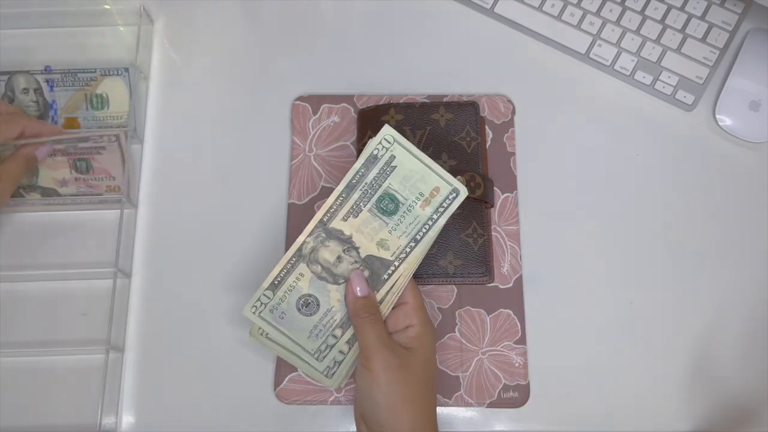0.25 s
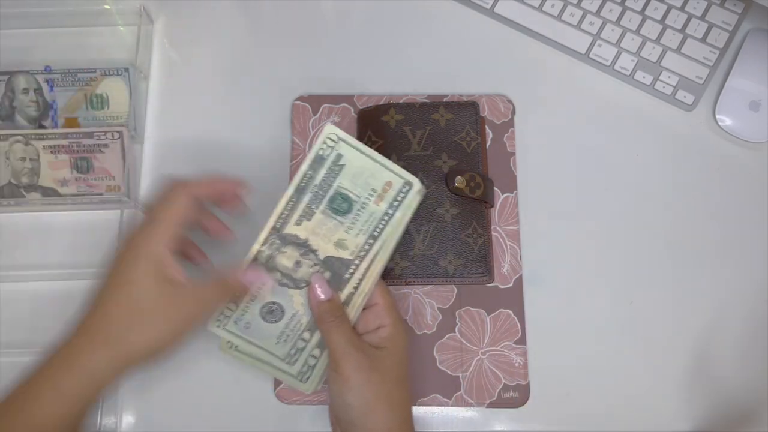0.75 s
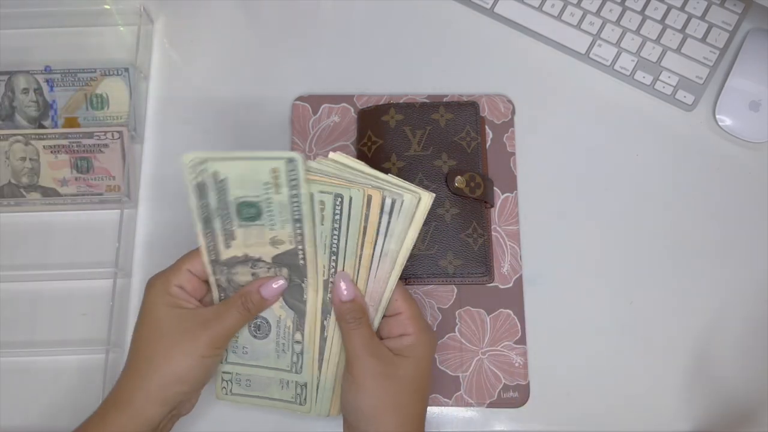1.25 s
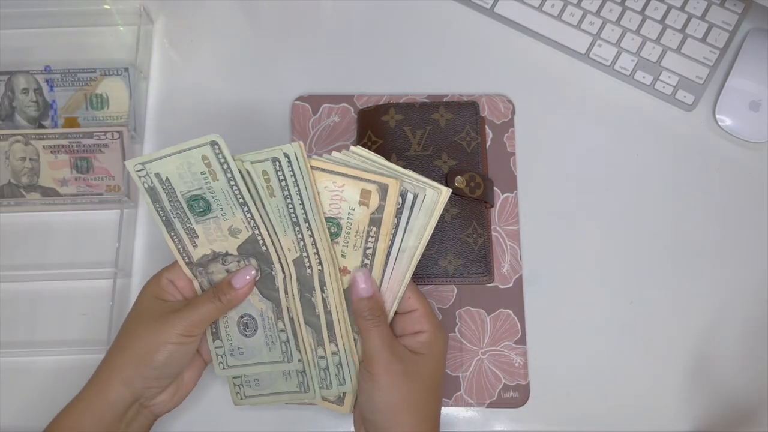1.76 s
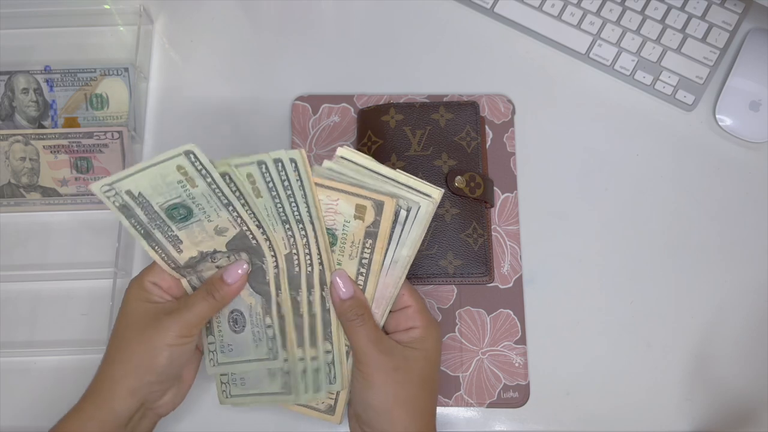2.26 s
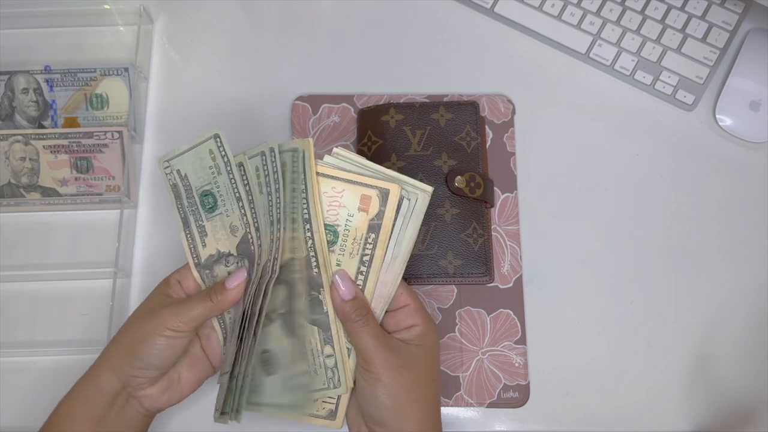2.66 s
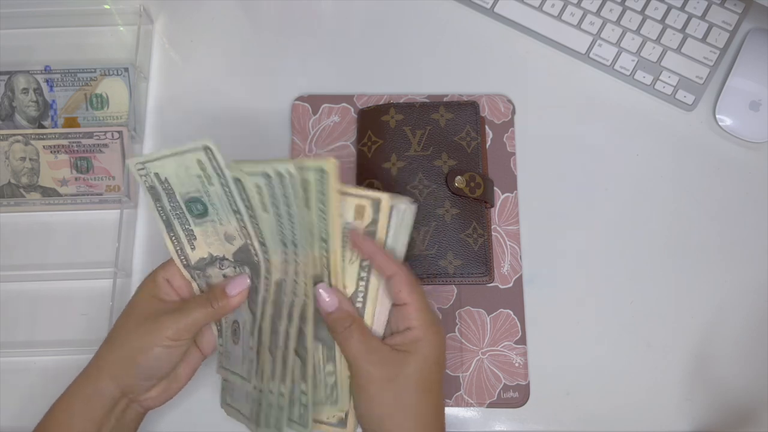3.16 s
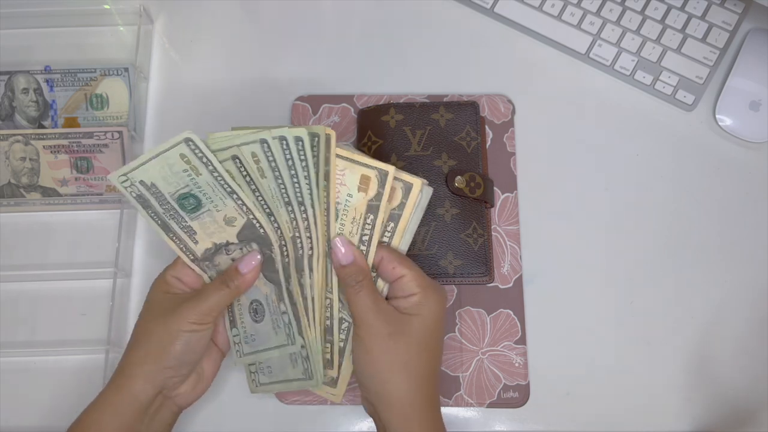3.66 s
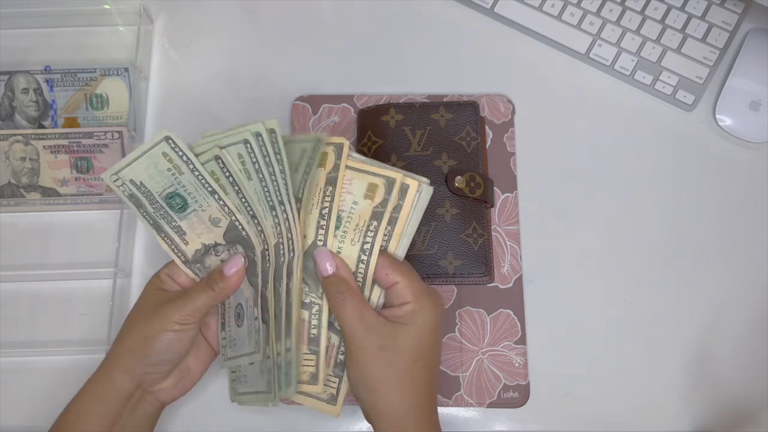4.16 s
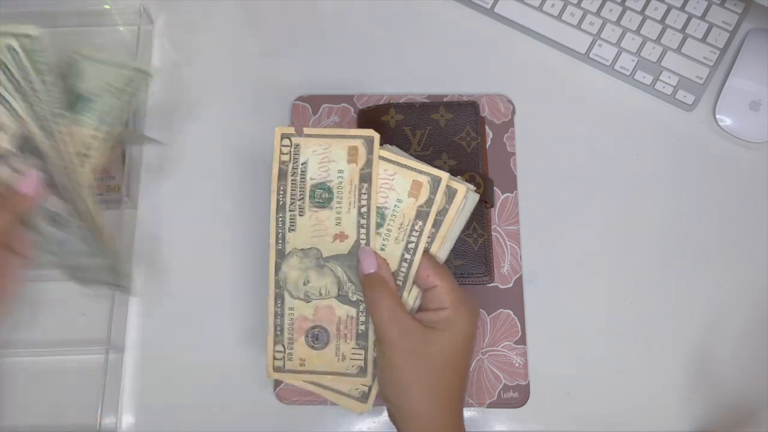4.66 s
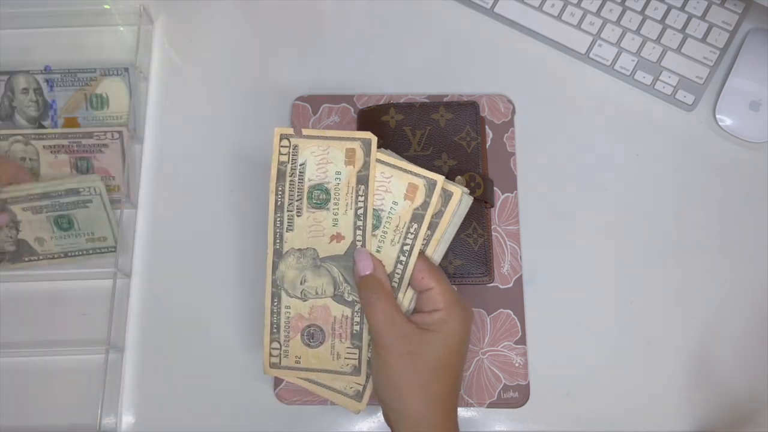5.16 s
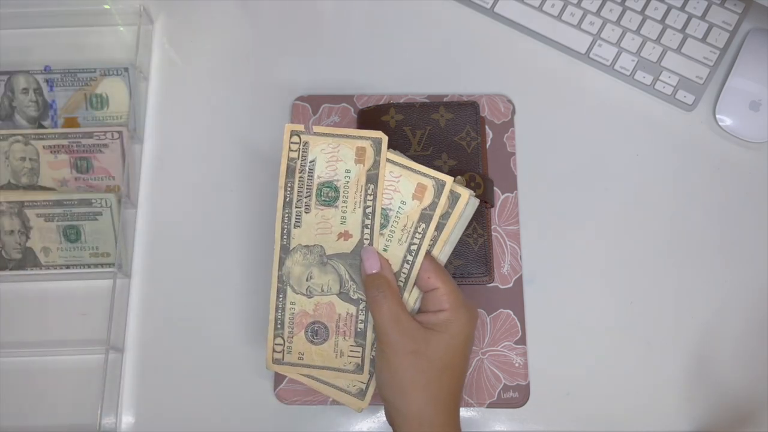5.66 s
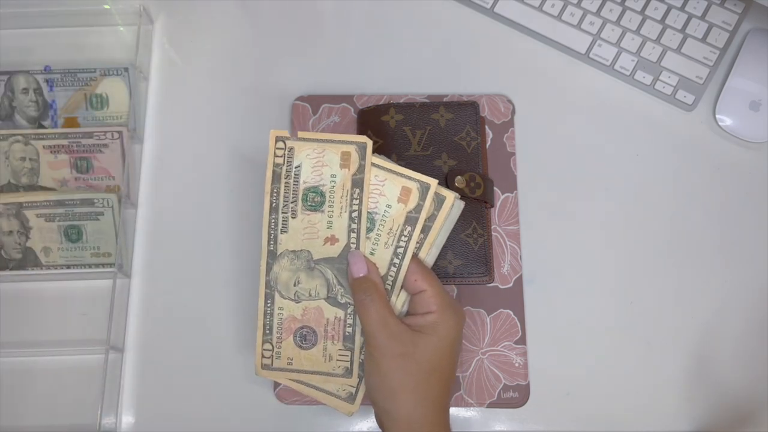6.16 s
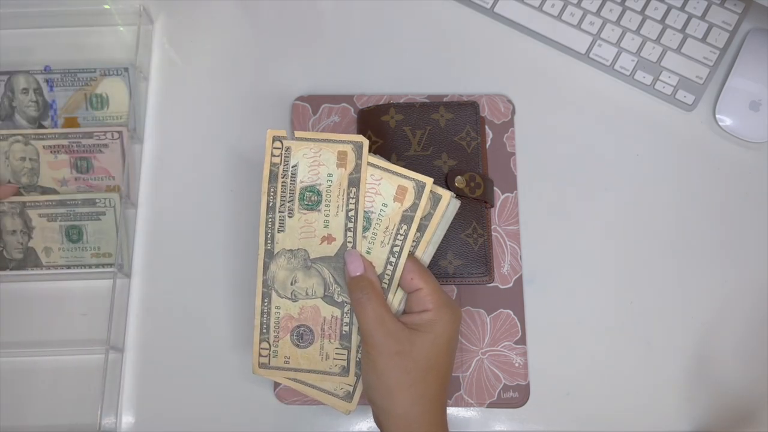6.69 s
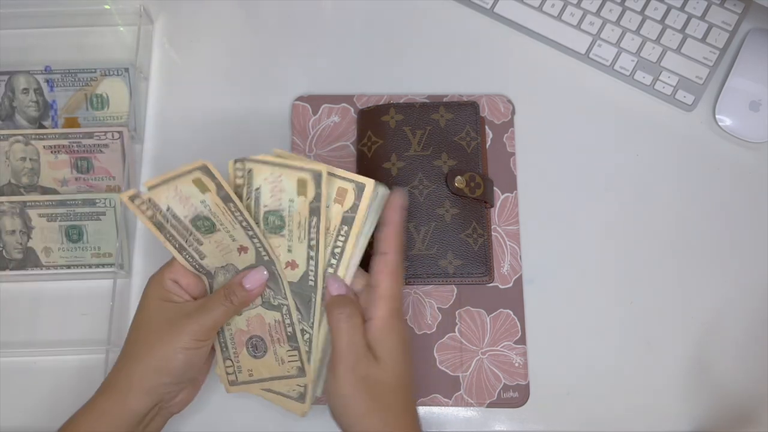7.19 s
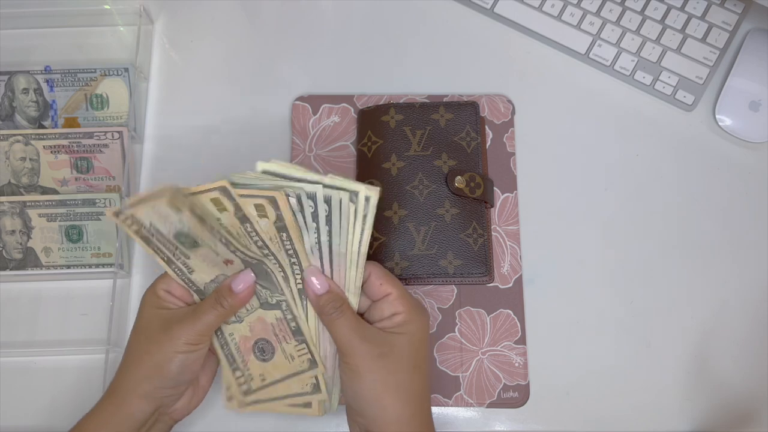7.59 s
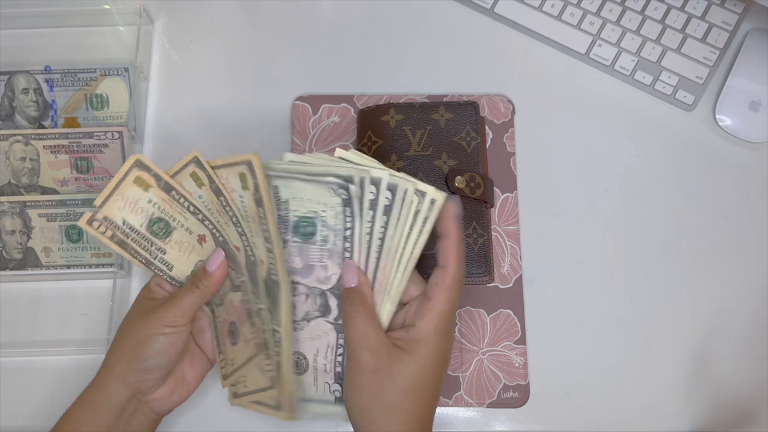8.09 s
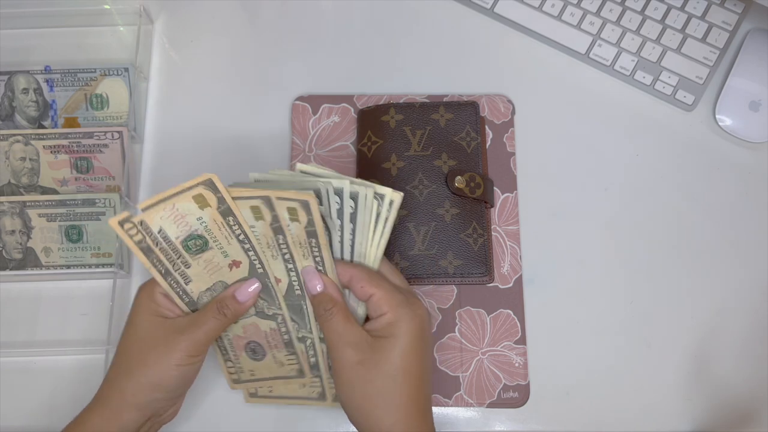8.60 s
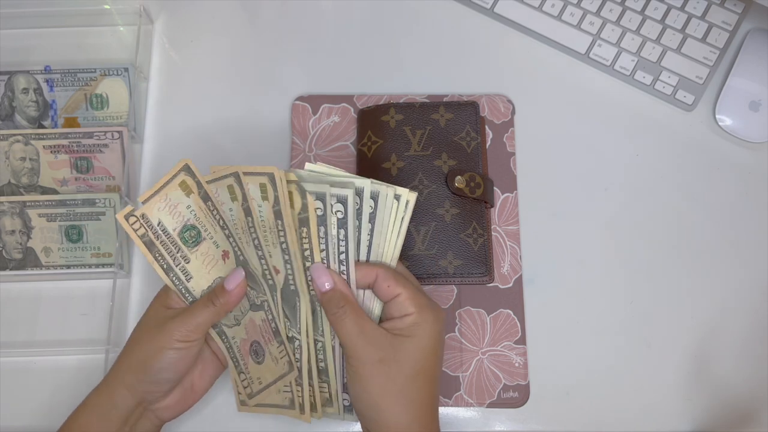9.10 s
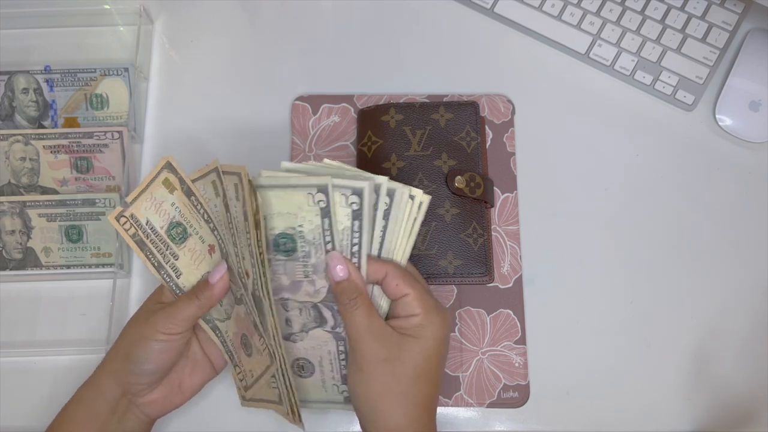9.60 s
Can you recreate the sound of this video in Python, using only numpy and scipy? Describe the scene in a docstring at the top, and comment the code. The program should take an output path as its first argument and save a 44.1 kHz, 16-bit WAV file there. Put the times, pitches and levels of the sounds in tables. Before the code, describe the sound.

Paper banknotes rustle, slide and snap between two hands, with sharp little clicks as they are tapped into a plastic tray on a desk.

```python
"""Paper banknotes are fanned, slid over each other and pressed into a plastic tray, under a phone above a desk.
Sliding sheets hiss as noise in fine, uneven grains; the stack flaps below. Creases and flicks are sprays of clicks.
Scraped edges sing as noise in narrow bands. Touches ring a few tray tones; the desk thuds dully.
Fading noise makes the echoes of desk and walls, over filtered noise for room air and a low rumble.
Two microphone ports hear it all out of step."""
import sys
import numpy as np
from scipy import signal
from scipy.fft import rfft, irfft, next_fast_len
from scipy.io import wavfile
from scipy.ndimage import uniform_filter1d

SR = 44100
rng = np.random.default_rng(int(sys.argv[2]) if len(sys.argv) > 2 else 0)


def generate_wav(sig):
    """Save sig (samples, or channels by samples) to the path in sys.argv[1] as 16-bit PCM at SR."""
    pcm = np.round(np.clip(np.atleast_2d(sig).T, -1, 1) * 32767).astype(np.int16)
    wavfile.write(sys.argv[1], SR, pcm)


N = 433944  # length in samples


def undb(db):
    """Turn decibels into an amplitude factor."""
    return 10 ** (np.asarray(db) / 20)


def unit(x):
    """Scale to rms 1."""
    return x / np.sqrt(np.mean(x ** 2, axis=-1, keepdims=True))


def curve(table, column):
    """One column of a time table at every sample."""
    return np.interp(np.arange(N) / SR, [row[0] for row in table], [row[column] for row in table])


def across(table, column, size):
    """One column of a frequency table at every bin of a transform."""
    hz = np.arange(1, size // 2 + 2) * SR / size
    return np.interp(np.log(hz), np.log([row[0] for row in table]), [row[column] for row in table])


def colour(x, table, size=4096):
    """Causal filter with the shape of the given spectrum that keeps the power of white noise."""
    # folding the cepstrum makes the filter respond as early as possible
    cepstrum = irfft(np.log(undb(across(table, column=1, size=size))))
    cepstrum[1:size // 2] *= 2
    cepstrum[size // 2 + 1:] = 0
    response = irfft(np.exp(rfft(cepstrum)))
    return signal.fftconvolve(x, response / np.sqrt(np.sum(response ** 2)))[:N]


def band(x, lo_hz, hi_hz):
    """Band-pass that keeps the power of white noise."""
    sos = signal.butter(2, [lo_hz, hi_hz], "bandpass", fs=SR, output="sos")
    return signal.sosfilt(sos, x) * np.sqrt(SR / 2 / (hi_hz - lo_hz))


def walk(rate):
    """Random levels held 1 / rate s, smoothed twice and scaled to rms 1."""
    k = int(SR / rate)
    steps = np.repeat(rng.standard_normal(N // k + 1), k)
    return unit(uniform_filter1d(uniform_filter1d(steps, k), k)[:N])


def slips(spread_db, grain_ms):
    """Noise in short grains of uneven size: fibres that catch and let go."""
    k = max(int(grain_ms * SR / 1000), 1)
    grain_db = spread_db * np.minimum(rng.exponential(size=N // k + 1), 3)
    size = np.repeat(undb(grain_db), k)[:N]
    return unit(size * rng.standard_normal(N))


def crackle(rate, spread_db, fall_ms):
    """Envelope of lone ticks of uneven size, on average rate per second, each dying away."""
    size = undb(spread_db * np.minimum(rng.exponential(size=N), 3))
    ticks = (rng.random(N) < rate / SR) * size
    return signal.lfilter([1], [1, -np.exp(-1000 / (fall_ms * SR))], ticks)


def bursts(table, column, fall_ms):
    """Envelope that rises within 2.2 ms at each event and dies away exponentially."""
    kicks = np.zeros(N)
    for row in table:
        kicks[int(row[0] * SR)] = undb(row[column])
    t = np.arange(SR // 8) / SR
    shape = np.exp(-t * 1000 / fall_ms) * np.minimum(t / 0.0022, 1)
    return signal.oaconvolve(kicks, shape)[:N]


def blows(table, fall_ms, thump_ms, thump_db, crack_db, sizzle_db):
    """A spray of clicks at each event: soft low push, crack and bright sizzle."""
    thump = band(slips(0.76, 0.47) * bursts(table, column=2, fall_ms=thump_ms), 250, 844)
    crack = band(slips(2.4, 0.46) * bursts(table, column=1, fall_ms=fall_ms), 910, 4110)
    sizzle = band(slips(3.5, 0.4) * bursts(table, column=3, fall_ms=1.18 * fall_ms), 4900, 14000)
    return undb(thump_db) * thump + undb(crack_db) * crack + undb(sizzle_db) * sizzle


def strokes():
    """Level in dB and brightness of all sliding: each stroke swells and fades over the rustle of the grip."""
    # one sheet pulled over the next: full_speed_s, level_db, length_s, brightness [dB per octave]
    pulls = [(0.256, -44.5, 0.085, 1), (0.373, -46.5, 0.18, -0.9), (0.509, -44, 0.086, 0.2),
             (0.825, -51.5, 0.15, 0.3), (1.066, -59, 0.82, -2), (1.481, -59, 0.23, 0.5),
             (1.915, -54.5, 0.42, -0.5), (2.606, -61, 0.13, 0.7), (2.857, -55.5, 0.24, 1.5),
             (3.16, -52, 0.51, 0.1), (3.42, -53.5, 0.41, 0.9), (3.577, -53.5, 0.49, -0.5),
             (3.903, -59.5, 0.16, -0.3), (4.143, -56, 0.47, -1.5), (4.474, -51.5, 0.41, 1.1),
             (4.674, -50, 0.25, 1.1), (4.994, -43.5, 0.23, -1), (5.157, -56, 0.68, -1),
             (5.453, -50, 0.19, -0.5), (6.119, -51.5, 0.15, -1), (6.708, -59, 0.14, -0.5),
             (7.103, -53.5, 0.39, 0), (7.365, -50.5, 0.38, 1.16), (7.493, -46.5, 0.052, 0.5),
             (7.636, -54.5, 0.33, -0.5), (8.033, -46.5, 0.42, 1), (8.203, -44.5, 0.1, 1),
             (8.846, -57.5, 0.26, 1), (8.975, -55.5, 0.18, 1.5), (9.49, -55.5, 0.2, 0)]
    # rustle of the notes held in the hands, which swells and nearly dies away: time_s, level_db
    grip = [(0, -59), (.55, -79), (.7, -93), (.95, -66.5), (1.7, -79.5), (2.33, -68), (2.52, -84.5),
            (4.3, -79), (4.85, -97), (5.4, -60.5), (5.68, -91), (6.95, -88.5), (7.85, -73.5), (8.46, -57),
            (8.7, -66), (9.18, -64.5), (9.3, -64), (9.84, -64)]
    range_db, rise = 26.5, 0.4  # swell over the length; share of it spent rising
    t = np.arange(N) / SR
    power = undb(2 * curve(grip, column=1))  # twice the dB turns amplitude into power
    bright = np.zeros(N)
    for at, db, length, tilt in pulls:
        near = slice(max(int((at - 2 * length) * SR), 0), int((at + 2 * length) * SR))
        away = np.maximum((at - t[near]) / rise, (t[near] - at) / (1 - rise)) / length
        swell = undb(2 * (db - range_db * away))
        power[near] += swell
        bright[near] += tilt * swell
    return 10 * np.log10(power), bright / power


def at_tray():
    """1 while the hand works in the tray, where the notes flap a little more softly; 0 elsewhere."""
    # times in the tray: start_s, end_s
    visits = [(0, 0.9), (4.849, 6.85)]
    t = np.arange(N) / SR
    return sum((t > start) & (t < end) for start, end in visits)


def sliding():
    """Sheets hiss past each other in uneven slips and crackle; the stack flaps softly below."""
    # loudness of the hiss from low to high: pitch_hz, level_db
    sheet = [(1000, -18.5), (2500, -11), (5500, -11), (11500, -4)]
    stroke_db, bright = strokes()
    drag_db = stroke_db + 1.59 * walk(35)
    # a fast stroke is a smooth swish; ticks stand out most in slow handling
    loose = undb(np.minimum(-0.35 * (drag_db + 60.5), 5))
    wide = loose * crackle(30, 3, 1.2)
    hiss = 0
    for hz in 1000 * 2 ** np.arange(0, 3.6, 0.4):
        sheet_db = np.interp(np.log(hz), np.log([row[0] for row in sheet]), [row[1] for row in sheet])
        # some ticks span the whole sheet, others only one size of fold
        grain = 0.74 + 0.68 * wide + 1.0 * loose * crackle(17, 3.26, 4.16)
        fibres = band(grain * slips(0.65, 0.91), 0.876 * hz, 1.303 * hz)
        hiss = hiss + fibres * undb(sheet_db + bright * np.log2(hz / 3400) + 1.8 * walk(18))
    grain = 0.68 + 0.5 * wide + 1.19 * loose * crackle(55, 1.5, 4.5)
    # 7 dB softer than the slide, 3 dB softer in the tray; placed 3 octaves below the middle of the hiss
    flap_db = -7 - 3 * at_tray() - 3 * bright + 0.37 * walk(8.9)
    flap = band(grain * slips(2.8, 3.3), 88, 830) * undb(flap_db)
    return (hiss + flap) * undb(drag_db)


def scraping():
    """A note edge scrapes and sings: uneven slips ring a few narrow resonances of the bent note."""
    # scrapes: middle_s, length_s, lowest_hz, level_db
    scrapes = [(3.552, 0.048, 1725, -59.5), (8.338, 0.061, 800, -67.5)]
    # pitches of the resonances as multiples of the lowest
    ratios = (1, 1.4, 1.85, 2.2)
    t, out = np.arange(N) / SR, np.zeros(N)
    for at, length, hz, db in scrapes:
        near = np.abs(t - at) < length
        swell = np.clip(3 * (1 - 2 * np.abs(t[near] - at) / length), 0, 1)
        rub = slips(3.4, 2.5)[near] * undb(db) * swell
        out[near] = sum(band(rub, 0.946 * hz * r, 1.06 * hz * r) for r in ratios)
    return out


def snapping():
    """A crease gives way in a short spray of clicks."""
    # creases snapping in the hands, levels before the trims below: start_s, crack_db, thump_db, sizzle_db
    snaps = [(1.0945, -38.5, -41, -40), (2.226, -43, -54.5, -48.5), (2.394, -43, -40, -51.5),
             (2.4201, -37.5, -44, -48), (2.6917, -46, -57.5, -73), (2.9456, -36, -59, -55),
             (2.9973, -32, -45.5, -50.5), (3.0275, -39.5, -73, -55), (3.2824, -48.5, -51, -60),
             (4.1002, -31.5, -44, -39), (7.0239, -44, -48, -50), (7.0662, -40.5, -45.5, -49),
             (7.6914, -39.5, -49.5, -52.5), (8.0598, -33.5, -47, -43), (8.0822, -31.5, -52, -46),
             (8.3819, -19.5, -48.5, -24.5), (9.191, -33, -53.5, -62), (9.632, -39, -46.5, -51)]
    return blows(snaps, fall_ms=4.1, thump_ms=10.2, thump_db=3.0, crack_db=-5.5, sizzle_db=3.1)


def flicking():
    """Each flick is a short spray of clicks around the pitch of the bent edge."""
    # a nail flicks the edge of a note: start_s, level_db, pitch_hz
    flicks = [(.044, -40, 2880), (.551, -44.5, 990), (.835, -46.5, 818), (.965, -55.5, 2500),
              (1.148, -46, 990), (3.876, -57.5, 700), (6.071, -59.5, 1800), (6.213, -48.5, 1300),
              (6.749, -50.5, 1040), (8.12, -49, 1490), (8.164, -47, 4000), (8.205, -42, 3800),
              (8.364, -47, 1200), (8.446, -59, 2940), (8.512, -51, 2370), (8.537, -50.5, 904),
              (8.618, -54, 830), (8.909, -46.5, 1750), (9.398, -50, 2030)]
    out, t = np.zeros(N + SR), np.arange(SR // 20) / SR
    shape = np.exp(-t / 0.0047) * np.minimum(t / 0.0011, 1)
    spray = rng.standard_normal((len(flicks), len(t))) * shape
    for (at, db, hz), clicks in zip(flicks, spray):
        start = int(at * SR)
        out[start:start + len(t)] += undb(db) * band(clicks, 0.76 * hz, 1.27 * hz)
    return out[:N]


def tray():
    """A spray of clicks at each touch; the push of the hand sets the plastic box ringing."""
    # notes and nails striking the tray, levels before the trims below: start_s, crack_db, push_db, sizzle_db
    taps = [(0.023, -26.5, -46, -47), (0.063, -19.5, -39.5, -39), (0.0824, -29, -46, -39),
            (0.1249, -27, -37.5, -33.5), (0.1419, -26.5, -49.5, -61), (.272, -35, -43, -60),
            (0.386, -38, -42, -65), (0.401, -32.5, -42.5, -38), (0.4281, -35, -44.5, -51),
            (.516, -31, -59, -51), (4.8655, -51, -65.5, -56), (4.9206, -34.5, -60, -42),
            (4.9345, -24, -30.5, -36), (4.9454, -25.5, -62, -39), (5.035, -45, -43, -45),
            (5.1315, -28, -38.5, -46), (5.192, -42.5, -48, -55.5), (5.4808, -14.5, -28.5, -34),
            (5.5635, -36.5, -43, -46.5), (5.8296, -31, -51, -48), (6.099, -32.5, -51.5, -44),
            (6.2301, -32.5, -44.5, -44.5), (6.456, -50, -50, -42), (6.4692, -24.5, -39, -36),
            (6.6058, -47.5, -53.5, -56), (6.682, -56.5, -54, -53)]
    # ringing tones of the box: pitch_hz, level_db (before the trim below), time to fade by 60 dB [s]
    modes = [(1011, -2.5, 0.042), (1538, -0.5, 0.018), (2067, 2.5, 0.012)]
    push = rng.standard_normal(N) * bursts(taps, column=2, fall_ms=11.6)
    ring = 0
    for hz, db, t60 in modes:
        # the grip of the hand shifts each mode by some 6 percent
        shifted_hz = hz * (1 + 0.06 * walk(20))
        turn = np.exp(2j * np.pi * np.cumsum(shifted_hz) / SR)
        fade = np.exp(-np.log(1000) / (t60 * SR))
        # every touch lands elsewhere and wakes another mix of modes
        drive = push * undb(db + 2.5 * walk(30))
        ring = ring + (turn * signal.lfilter([1], [1, -fade], drive / turn)).imag
    clicks = blows(taps, fall_ms=4.73, thump_ms=3.7, thump_db=-12.5, crack_db=-5.0, sizzle_db=4.9)
    return clicks + undb(-19.0) * ring


def desk():
    """Dull low thuds through the table top."""
    # the hand rests on the desk: start_s, level_db
    thuds = [(1.472, -53.5), (5.14, -43.5), (6.49, -47)]
    return band(rng.standard_normal(N) * bursts(thuds, column=1, fall_ms=29), 65, 280)


def room():
    """Faint air noise and a low rumble that wavers."""
    # shape of the air noise, only relative: pitch_hz, level [dB per Hz]
    air_shape = [(30, -16.5), (60, -6.5), (140, -11.5), (350, -16), (1000, -28), (8500, -68), (13000, -51)]
    # loudness of the rumble: time_s, level_db
    rumble_level = [(0, -72.5), (3.3, -65.5), (6.6, -73.5), (7.8, -73), (9.84, -68.5)]
    air_db = -73.5 + 0.66 * walk(0.23)
    air = undb(air_db) * colour(rng.standard_normal(N), air_shape, size=16384)
    rumble = band(band(rng.standard_normal(N), 47, 70.3), 43, 140)
    return air + unit(rumble) * undb(curve(rumble_level, column=1))


def scene():
    """Each port gets the direct sound and its own scatter of echoes from desk and walls."""
    # the two ports: pitch_hz, gain_db, left minus right [dB]
    port_gains = [(60.7, -1, -0.5), (650, -2.5, 5.5), (1390, -1, 4.5), (4900, 0.5, 6.5), (7530, 1.5, 2.5),
                  (10950, 5.5, -2), (11200, 6, 4.5), (11830, -2.5, -1), (13100, -22, 0.5)]
    # the ports pass through opposite phase near their resonance: pitch_hz, left leads by [rad]
    lead = [(1600, 0), (5000, .9), (6500, 0), (7400, 1), (8600, 0), (10250, -3.14), (11700, -6.28)]
    echo_t60_s, echo_db = 0.21, -7.5  # time to fade by 60 dB; level against the direct sound
    sound = sliding() + scraping() + snapping() + flicking() + tray() + desk() + room()
    size = next_fast_len(N + SR)
    t = np.arange(SR // 2) / SR
    # the echoes start 2 ms after the direct sound
    echoes = rng.standard_normal((2, len(t))) * undb(-60 * t / echo_t60_s) * (t > 0.002)
    echoes = rfft(echoes / np.sqrt(np.sum(echoes ** 2, axis=1, keepdims=True)), size)
    gain_db = across(port_gains, column=1, size=size)
    pan_db = across(port_gains, column=2, size=size)
    side = np.array([[0.5], [-0.5]])  # left, right
    ports = (1 + undb(echo_db) * echoes) * undb(gain_db + side * pan_db)
    ports = ports * np.exp(1j * side * across(lead, column=1, size=size))
    return irfft(rfft(sound, size) * ports, size)[:, :N]


def record(dry):
    """The phone cuts the deepest bass below 38 Hz and the top above 13 kHz."""
    bass_cut = signal.sosfilt(signal.butter(2, 38, "highpass", fs=SR, output="sos"), dry)
    return signal.sosfilt(signal.ellip(8, 0.2, 60, 13000, fs=SR, output="sos"), bass_cut)


dry = scene()
out = record(dry)
generate_wav(out)
```